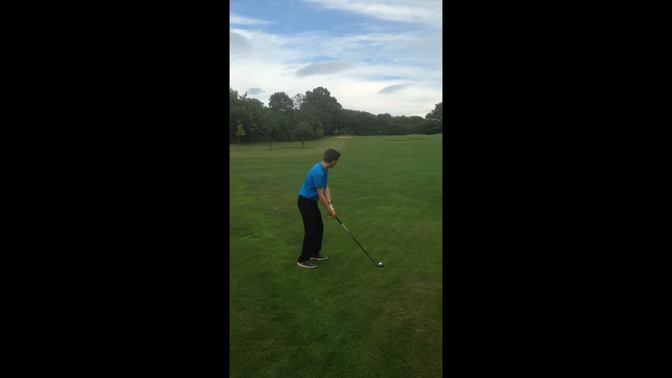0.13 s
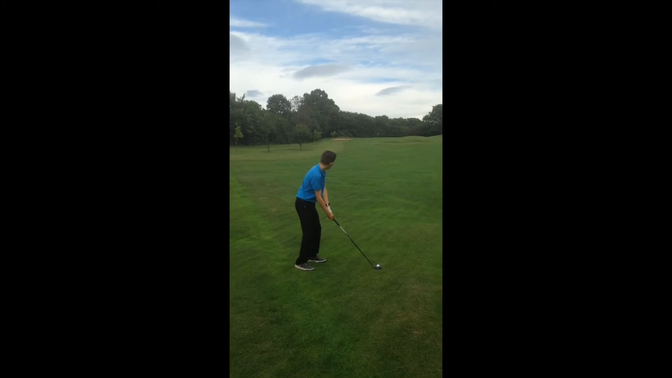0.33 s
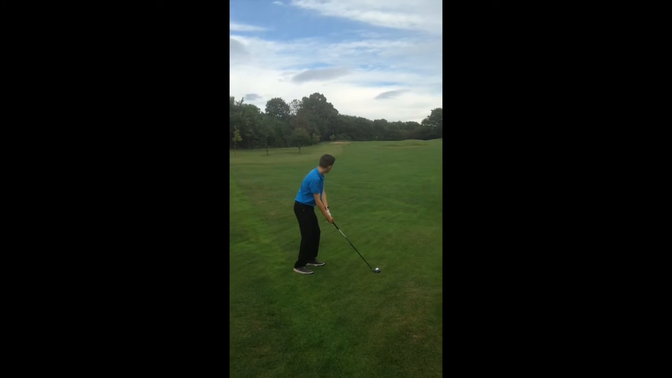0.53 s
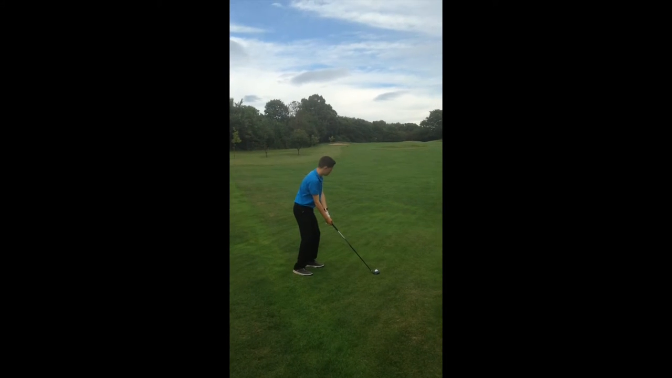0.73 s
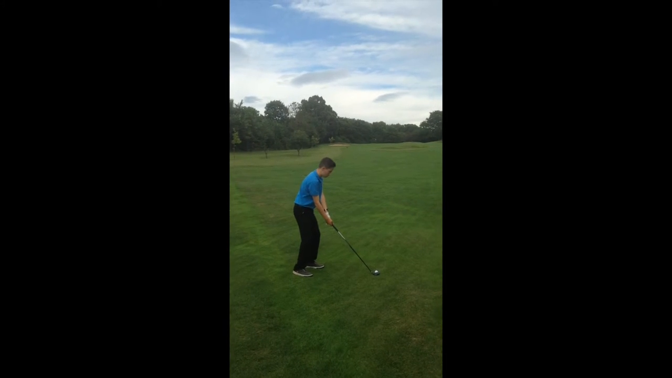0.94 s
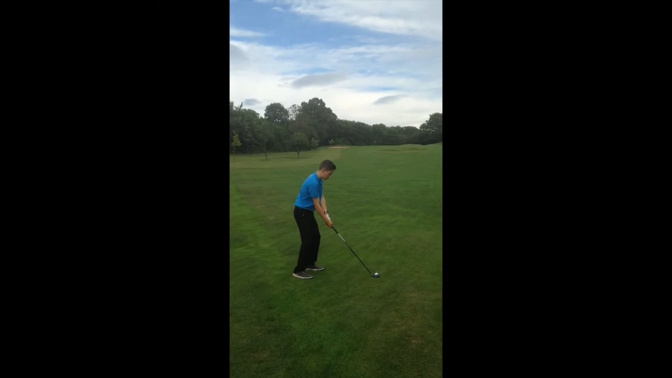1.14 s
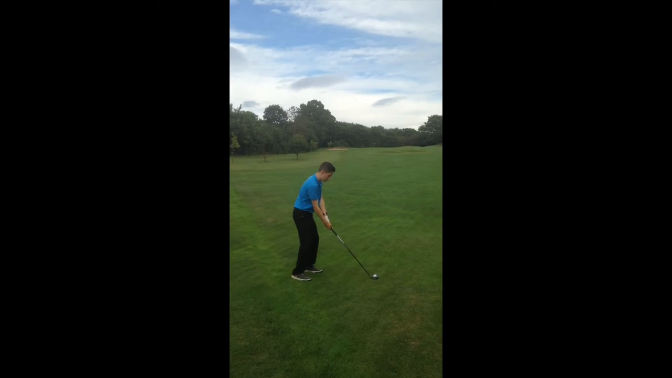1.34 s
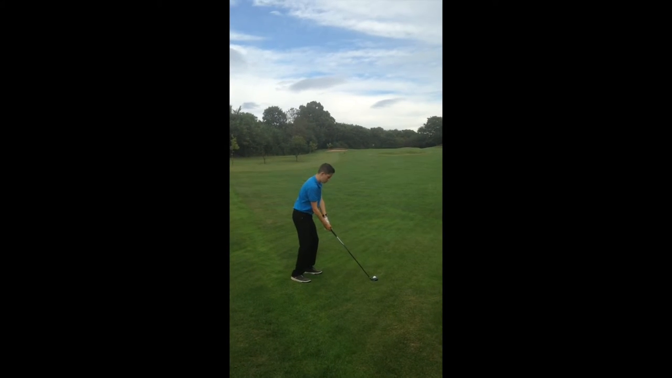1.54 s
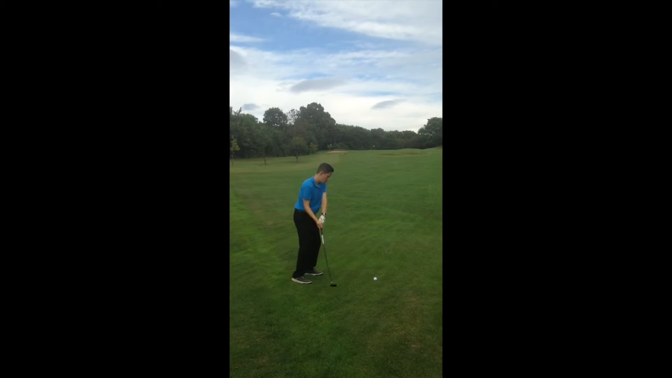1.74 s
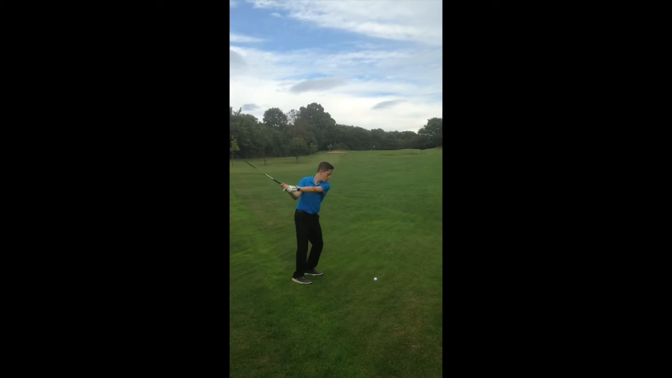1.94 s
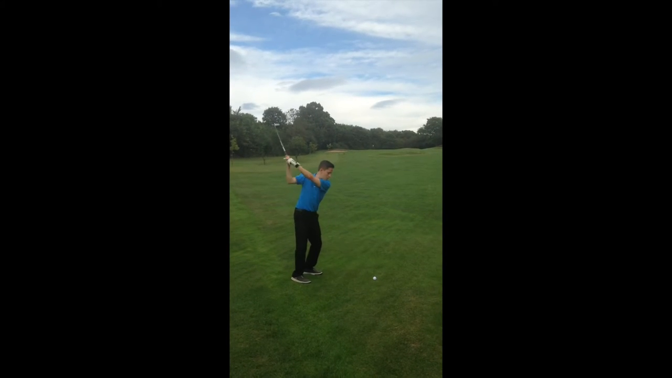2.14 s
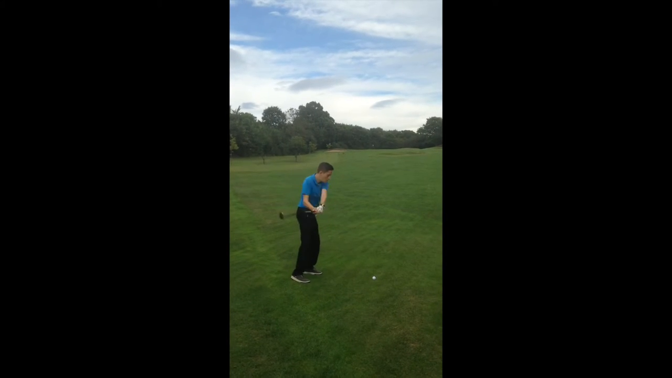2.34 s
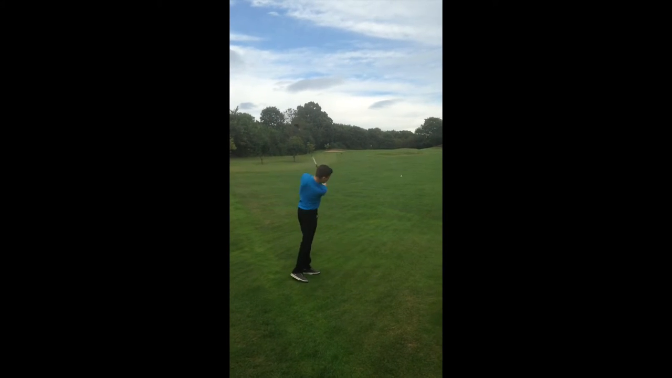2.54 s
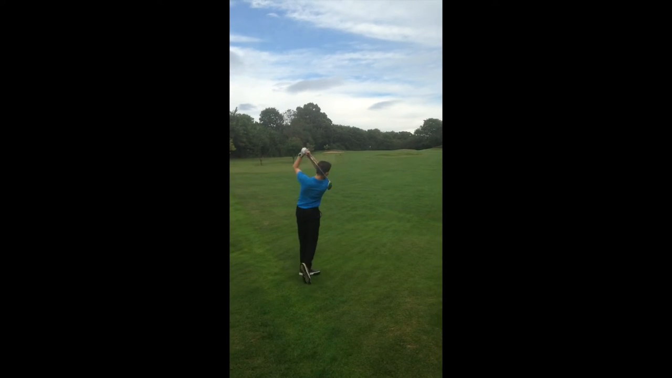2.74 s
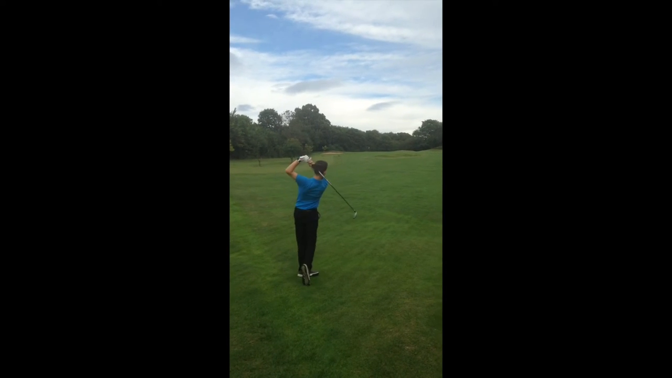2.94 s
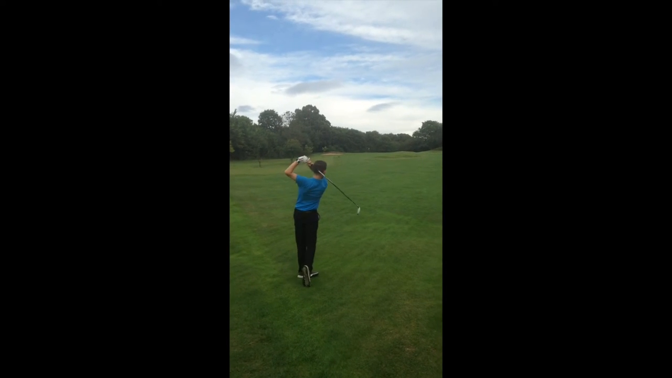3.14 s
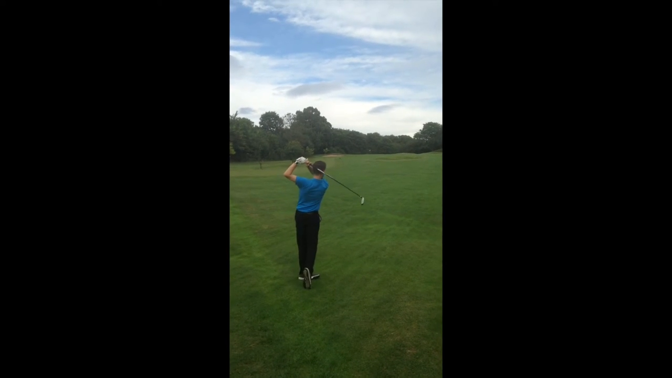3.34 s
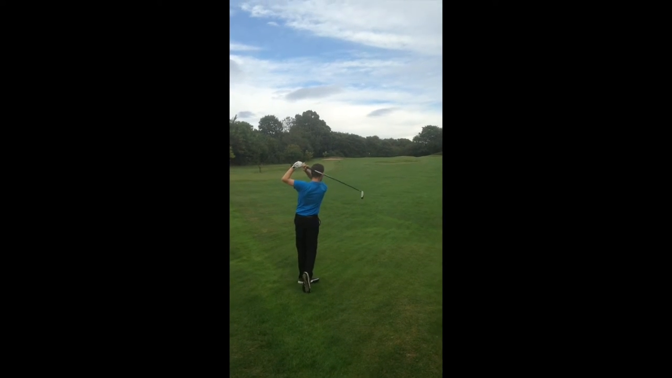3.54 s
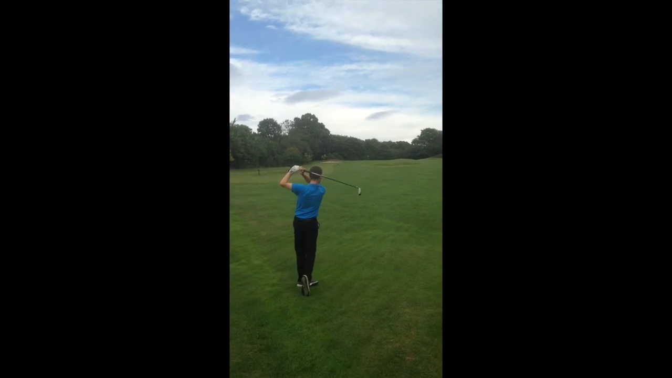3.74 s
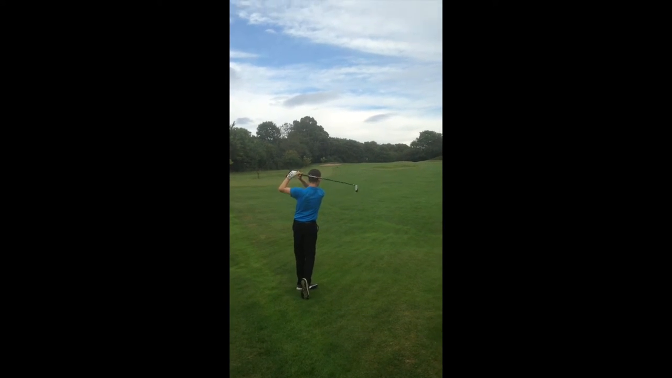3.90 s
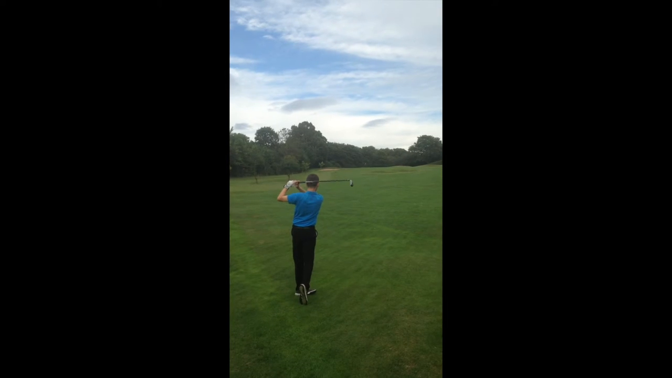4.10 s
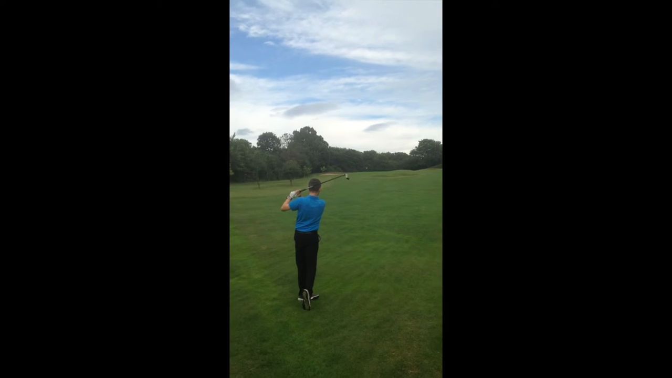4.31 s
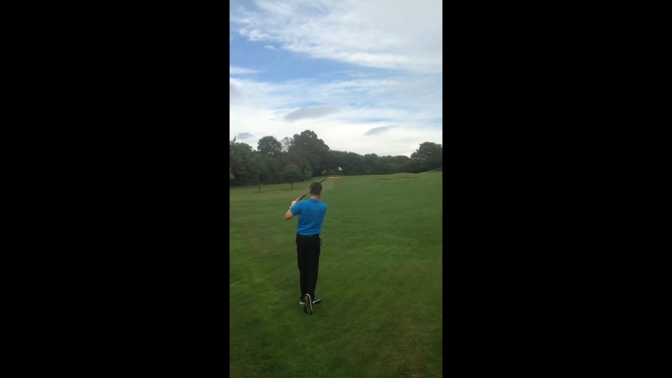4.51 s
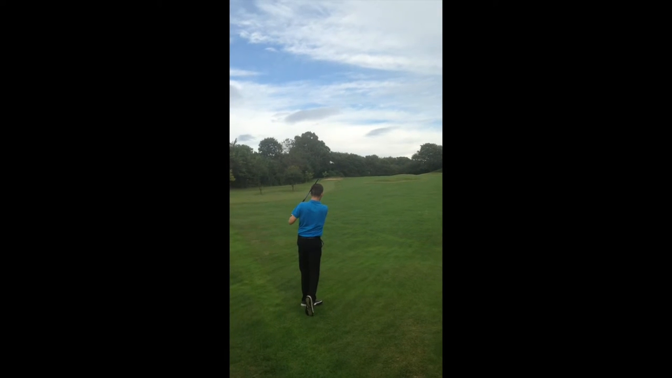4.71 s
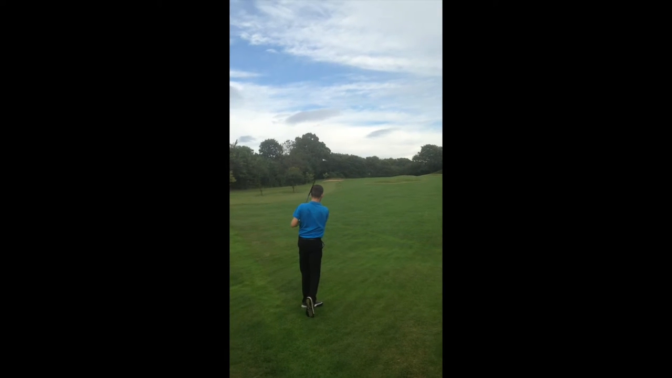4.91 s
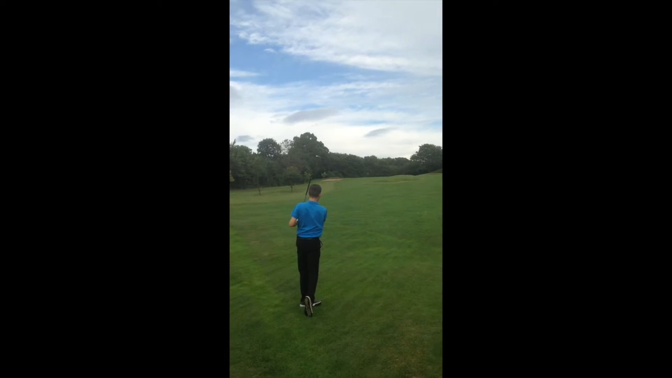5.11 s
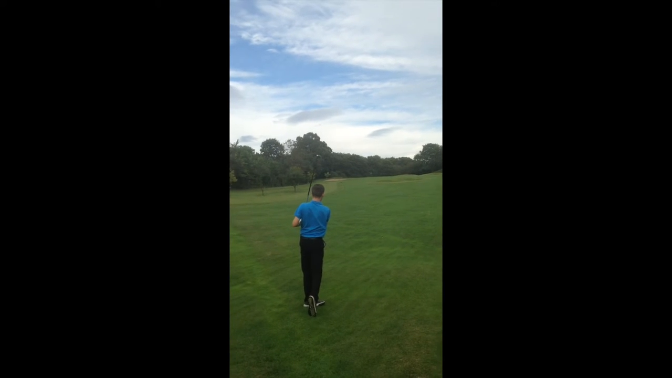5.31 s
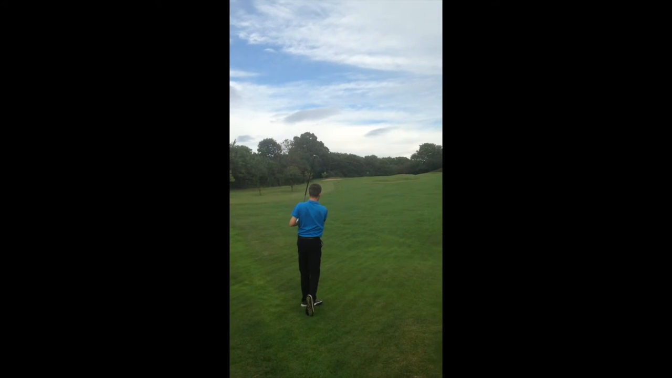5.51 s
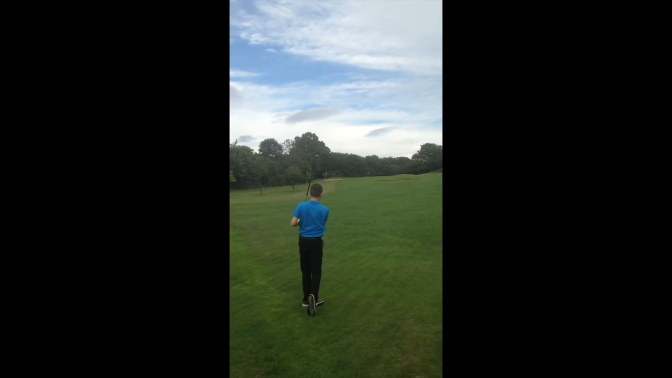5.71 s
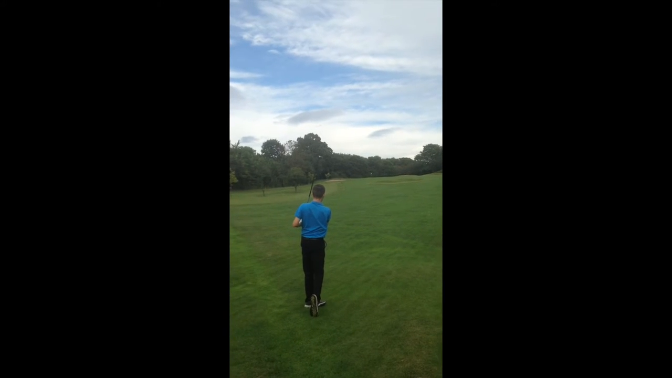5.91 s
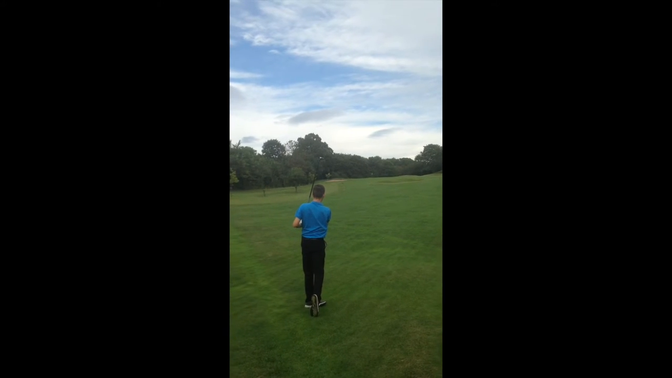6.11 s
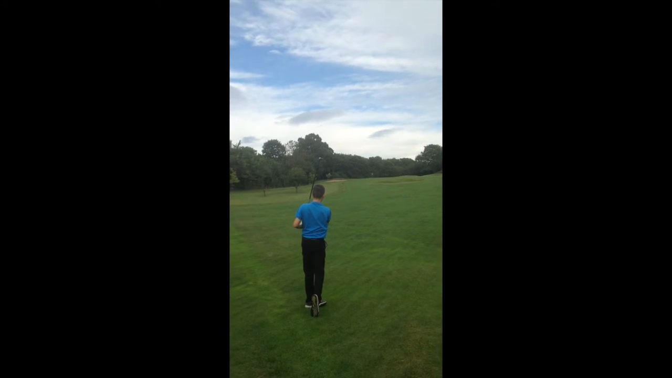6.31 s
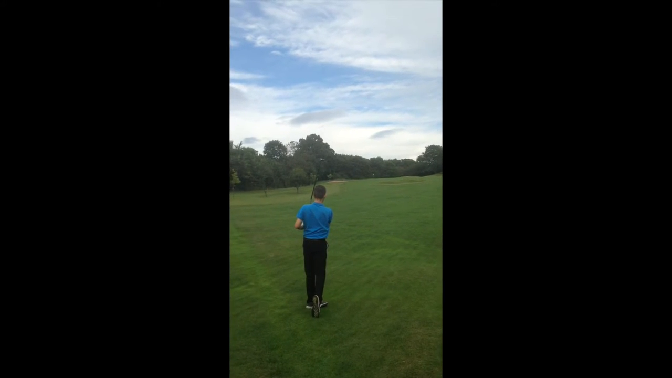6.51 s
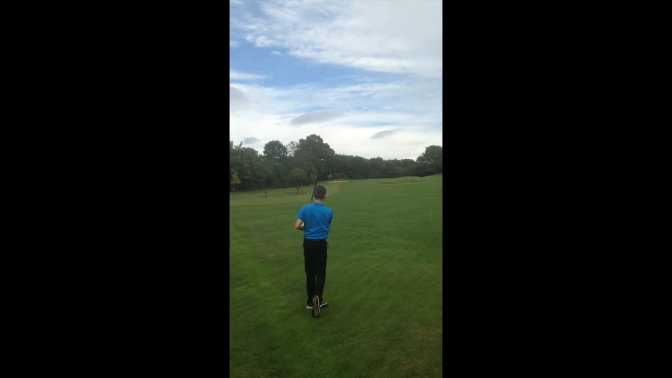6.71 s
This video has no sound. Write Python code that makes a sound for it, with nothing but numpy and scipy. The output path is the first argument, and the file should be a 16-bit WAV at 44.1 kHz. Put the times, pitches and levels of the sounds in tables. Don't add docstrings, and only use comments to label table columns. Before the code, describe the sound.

An open, breezy grass field heard through a hand-held phone a few metres from a golfer. From 0 s a quiet, low petrol engine drones far away, its buzzing notes and slight clatter wavering over soft rumble and smooth hiss. Small wind bumps touch the microphone near 0.1 s, and a dull little knock falls at 0.95 s. Just before 2.5 s a short airy swish rises quickly into one extremely sharp, loud club strike: a compact thud, bright steel click and brief tearing turf, over almost at once. A faint leafy echo returns within 0.2 s, with a soft follow-through whoosh near 2.7 s and tiny grit ticks near 2.77 s. The hum carries on, its bass thinning after 3.1 s. Light wind crackles and bumps gather around 4.05 s. The engine drifts farther off, its pitch sagging slightly, nearly gone by 6.7 s.

```python
import sys
import numpy as np
from scipy import signal
from scipy.fft import rfft, irfft
from scipy.io import wavfile
from scipy.ndimage import uniform_filter1d, map_coordinates

SR = 44100
rng = np.random.default_rng(int(sys.argv[2]) if len(sys.argv) > 2 else 0)


def generate_wav(signal):
    frames = np.transpose(np.atleast_2d(signal))
    scaled = np.clip(frames, -1, 1) * 32767
    pcm = np.round(scaled).astype(np.int16)
    wavfile.write(sys.argv[1], SR, pcm)


def to_linear_factor(level_db):
    exponent = np.asarray(level_db, float) / 20
    return 10 ** exponent


N = 297675
TIME = np.arange(N) / SR

# (time [s], cycle rate [Hz], level [dB])
ENGINE_DRIVE = [
    (0, 37.23, -53.5),
    (.9, 37.05, -53.5),
    (1.2, 36.69, -55),
    (2.0, 36.58, -53),
    (2.9, 36.49, -53.5),
    (3.6, 36.33, -59),
    (4.5, 36.18, -59),
    (5.0, 36.21, -59),
    (5.9, 35.94, -61),
    (6.75, 36.08, -63),
]
# (multiple of cycle rate, facing [dB], side-on [dB],
# half-turned [dB], three-quarters [dB], turned away [dB])
ENGINE_NOTES = [(2, 0, -4, -1, -7, -1.5), (3, -20, -24, -21, -17, -15), (4, 2.5, 1, 3.5, 5.5, 6),
                (6, 1.5, -3.5, -7, -6.5, -13), (8, -13.5, -8.5, -5.5, -9.5, -5),
                (9, -20, -33.5, -28, -27, -35), (10, -14.5, -12, -20.5, -27, -30),
                (11, -33, -20, -15, -13.5, -18), (12, -30, -40, -13, -7, -7),
                (13, -12, -16, -28.5, -24, -9), (14, -8, -6.5, -6, -8, -21),
                (15, -34, -17.5, -7, -5.5, -9.5), (16, -8, -31, -8, -5.5, -3.5),
                (17, -11.5, -16.5, -25.5, -32, -27), (18, -21.5, -13.5, -14.5, -20, -29.5),
                (19, -23, -16.5, -3.5, -5.5, -13.5), (20, -13.5, -17, -21.5, -8.5, -13),
                (21, -19, -14, -23, -33, -16), (22, -34, -25, -24, -24, -28),
                (23, -19, -33.5, -18, -18, -27), (24, -26, -25, -35, -25, -17.5),
                (25, -43, -25, -39, -39, -42), (26, -23, -39, -36, -34, -37)]
SIDE_TIMES = [0.698, 2.2, 3.55, 4.25, 5.1]
SHIMMER, SHIMMER_RISE = .07, 0.0099
WAVER, WAVER_RISE = .15, .0045

# (time [s], lift [dB], length [s], centre [octaves above 500 Hz])
BREATHS = [(.02, 4.5, 0.041, 1.3), (0.19, 11, 0.086, 1.5), (0.33, 9.5, .07, -5), (0.81, -2.5, 0.14, 0),
           (3.1, 6.5, 0.064, 6), (4.67, -5.5, 0.16, -4), (1.018, 5.5, 0.057, 0.9), (1.08, 5.5, 0.059, 3),
           (1.46, 3.5, 0.29, 1), (1.98, 7, 0.09, 3), (2.3, 2.5, 0.26, 1), (2.53, 9, 0.12, 1.83),
           (2.808, 6.5, 0.064, 0.4), (3.688, 8, 0.079, 2.5), (4.55, 1.5, 0.12, -2.5),
           (3.85, 3.5, 0.16, 0.7), (4.845, 4.5, 0.058, 1.5), (4.95, 4.5, 0.105, 0.7), (4.6, -3.5, 0.13, -4),
           (5.7, 2.5, 0.2, -3), (3.25, 3.5, 0.052, -3.5), (1.3, 2, .15, -1), (4.85, 3, .1, -4),
           (3.9, 5, 0.088, -4), (0.91, 0.5, 0.072, -1), (2.35, 2, .12, -6), (6.204, -3.5, .12, 0),
           (5.6, 4, 0.053, 3.5), (5.2, 4, 0.13, 1.3), (5.6, 0, 0.08, 6), (6.5, 5, 0.069, 1)]
BREATH_WIDTH_OCTAVES = 0.85
# (start [s], end [s], change [dB])
LULL_SPELLS = [
    (0.784, 0.947, 0.5),
    (3.099, 3.488, -5),
    (3.749, 4.281, -10.5),
    (4.313, 4.477, -5.5),
    (6.19, 6.9, -7.5),
]
LULL_NOTE_SHARES = {2: 0.34, 3: .9, 4: 1.16, 6: 0.48, 8: 0.44}
LULL_EDGE_S, LULL_RUMBLE_SHARE = 0.05, 0.25

# (frequency [Hz], level [dB per Hz])
FIELD_SPECTRUM = [(12, -51), (20, -30), (35, -14), (52, -2), (96, 0), (150, -1.5), (198, -7), (293, -6),
                  (347, -13.5), (430, -13), (574, -7.5), (642, -11.5), (718, -10), (1220, -20.5),
                  (2260, -25.5), (14700, -51), (16000, -42.5)]
FIELD_DB = -53.5
RUMBLE_FADE, ROAR_FADE, RASP_FADE, BRIGHT_FADE = 0.39, 0.36, 0.42, 0.76
CLATTER_SHARE, CLATTER_CHANGE_S, CLATTER_EVEN = .18, .07, .5
GROUND_LAG_S, GROUND_SHARE = .00786, 0.38

# (time [s], level [dB], length [s], polarity [+-])
PUFFS = [(.091, -35, .008, 1), (.1335, -35, .009, -1), (3.724, -30.5, .0036, -1), (3.727, -42, .003, 1),
         (4.105, -44, .005, -1), (4.169, -45, .005, 1), (4.0432, -36, .004, 1), (4.0452, -36, .014, -1),
         (4.0485, -36, .007, -1), (4.0508, -38, .004, 1), (4.0575, -39, .003, 1), (4.0803, -39, .006, -1),
         (4.0875, -42, .006, -1), (4.0905, -44, .008, 1), (4.0543, -37, .004, 1), (4.0667, -34, .003, -1),
         (4.0683, -38, .003, -1), (4.0772, -38, .006, 1), (4.0592, -31, .003, -1), (4.0526, -37, .003, -1),
         (4.0603, -32, .012, 1), (4.0633, -34, .003, 1), (4.0646, -25.5, .004, -1), (4.0711, -32, .004, -1),
         (4.0745, -33, .011, 1)]
# (time [s], level [dB], length [s])
BUFFETS = [
    (.1, -52.5, .06),
    (3.95, -60, .02),
    (4.06, -56, .018),
    (4.26, -68, .02),
    (6.17, -60, .04),
]
PUFF_RISE, PUFF_FALL = .11, .3

# (time [s], level [dB], length [s], centre [Hz])
PANEL_GLINTS = [(.18, -64, 0.045, 2300), (.4, -70, 0.056, 1900), (0.397, -75, .05, 2900),
                (.56, -74, 0.056, 2390), (1.4, -69, .08, 990), (1.95, -72, .06, 1000),
                (3.03, -71, 0.076, 1350), (4.12, -71, 0.054, 1500), (4.9, -77, .05, 2750),
                (5.09, -75, .05, 3100), (5.12, -76, .05, 2500), (0.884, -73, 0.042, 2500),
                (1.06, -73, .04, 2350), (1.5, -76, .06, 2580), (1.83, -70, 0.031, 2000),
                (1.964, -68, 0.069, 2230), (2.077, -71, .04, 2350), (2.31, -74, 0.043, 2000),
                (3.47, -75, 0.049, 2700), (3.65, -75, 0.032, 3050), (4.05, -72.5, .05, 2350),
                (5.04, -72, 0.03, 1650), (4.24, -77, 0.057, 2450), (4.65, -75, .1, 1350),
                (4.82, -75, .04, 2930), (4.954, -69, 0.061, 1490), (5.268, -70, 0.092, 1385),
                (5.579, -75, .05, 2500), (5.61, -81, .04, 2850), (6.47, -80.5, 0.045, 2800),
                (6.72, -76, .04, 1500)]
GLINT_WIDTH = 0.062

# (time [s], level [dB], centre [Hz], length [s])
GRIT_TICKS = [
    (.191, -67, 5900, .002),
    (.945, -52, 800, .003),
    (2.757, -72, 10500, .0008),
    (2.771, -69, 14000, .0008),
    (2.783, -73, 13000, .0008),
    (2.793, -75, 13500, .0008),
]

# (frequency [Hz], level [dB per Hz])
SWISH_SPECTRUM = [(1500, -20), (2500, 0), (5000, -4), (9000, -7), (13000, -10), (15500, -14)]
DOWNSWING_DB, DOWNSWING_RISE_DB_S, DOWNSWING_FALL_DB_S = -61, 151, 280
FOLLOW_S, FOLLOW_DB, FOLLOW_LENGTH_S = 2.67, -67.5, 0.12

STRIKE_S, STRIKE_DB, CONTACT_S = 2.490612, .4, .00003
# (frequency [Hz], level [dB], t60 [s], signed weight)
HEAD_MODES = [(696, -7.0, 0.0033, 1), (1330, 1.9, 0.0021, -1), (1993, -9.5, 0.0024, 1),
              (2413, -13.1, 0.003, 1), (4092, -24.1, 0.012, 1), (5017, -12.0, 0.003, 1),
              (5788, -29, 0.034, 1), (6770, -30, .012, -1), (7230, -14.9, 0.0046, -1),
              (9212, -33, 0.15, -1), (9286, -22, 0.4, -1), (9300, -21, .012, -1), (9341, -36, 0.2, -1),
              (9480, -37, 0.1, -1), (9570, -36, .05, 1), (11150, -24, 0.032, 1), (11723, -17.7, 0.0133, 1),
              (434, -23, 0.0065, 0.52), (2650, -34, 0.027, 0.89), (3220, -37.5, 0.031, 1),
               (3999.5, -28, 0.018, 0.93), (8020, -24.5, 0.022, 0.86), (10000, -34, .04, 1),
               (10400, -25, 0.012, 1), (10750, -27, .006, -1), (13200, -22, .01, 1),
               (12280, -14.5, 0.029, -1.5), (12950, -12.5, .011, 1), (13800, 3, .0025, 0.62),
               (14650, 1.5, 0.0044, -1)]
SWING_AWAY_S = .027
# (delay [s], level [dB], cut-off [Hz])
GRASS_BOUNCE = (.003, -24, 2600)
DIVOT_DB, DIVOT_T60_S = -35.5, 0.022
# (delay [s], spread [s], level [dB], centre [Hz])
TREE_ECHOES = [
    (.04, .01, -72, 6000),
    (.14, .018, -71, 6150),
    (.148, .02, -71, 4650),
    (.16, .025, -72, 3150),
    (.215, .015, -75, 4600),
    (.15, .03, -68, 2200),
]


def level(x, db):
    return x * to_linear_factor(db) / np.sqrt(np.mean(x ** 2))


def noise():
    return rng.standard_normal(N)


def curves(table):
    s, *columns = np.transpose(table)
    return [np.interp(TIME, s, c) for c in columns]


def bell(s, length, time=TIME):
    return np.exp(-.5 * ((time - s) / length) ** 2)


def band(x, lo_hz, hi_hz, order=2):
    sos = signal.butter(order, [lo_hz, min(hi_hz, 21000)], "band", fs=SR, output="sos")
    return signal.sosfilt(sos, x)


def walk(rate):
    held = np.repeat(rng.standard_normal(int(N / SR * rate) + 2), 8)
    slewed = uniform_filter1d(uniform_filter1d(held, size=8), size=8)
    return 1.3 * np.interp(TIME * rate * 8, np.arange(len(held)), slewed)


def coloured(spectrum, lo_hz=1, hi_hz=30000, source=None, order=8):
    source = noise() if source is None else source
    hz = np.arange(1, N // 2 + 2) * SR / N
    point_hz, point_db = np.transpose(spectrum)
    gain = to_linear_factor(np.interp(np.log(hz), np.log(point_hz), point_db))
    edges = 1 / np.sqrt((1 + (lo_hz / hz) ** order) * (1 + (hz / hi_hz) ** order))
    return irfft(rfft(source) * gain * edges, N)


def swells(centres_hz):
    s, db, length, octave = np.transpose(BREATHS)
    distance = np.log2(np.c_[centres_hz] / 500) - octave
    reach = db * np.exp(-.5 * (distance / BREATH_WIDTH_OCTAVES) ** 2)
    lift_db = reach @ bell(s[:, None], length[:, None], TIME[::16])
    return np.repeat(lift_db, 16, axis=1)[:, :N]


def lulls():
    def step(s):
        return .5 + .5 * np.tanh((TIME - s) / LULL_EDGE_S)
    return sum(db * (step(start) - step(end)) for start, end, db in LULL_SPELLS)


def engine():
    hz, engine_db = curves(ENGINE_DRIVE)
    phase = 2 * np.pi * np.cumsum(hz) / SR
    multiples = np.array([row[0] for row in ENGINE_NOTES])
    lifts_db, loss_db = swells(multiples * hz.mean()), lulls()
    out = 0
    for k, lift_db, (_, *side_db) in zip(multiples, lifts_db, ENGINE_NOTES):
        air_db = lift_db + LULL_NOTE_SHARES.get(k, 0) * loss_db
        db = engine_db + np.interp(TIME, SIDE_TIMES, side_db) + air_db
        flutter = 1 + (SHIMMER + SHIMMER_RISE * k) * walk(9)
        drift = (WAVER + WAVER_RISE * k ** 2) * walk(5 + .6 * k)
        lag = 0.27 * k + 0.0602 * k ** 2
        out = out + to_linear_factor(db) * flutter * np.sqrt(2) * np.cos(k * phase + drift - lag)
    return out


def clatter():
    turns = np.cumsum(curves(ENGINE_DRIVE)[0]) / SR
    pattern = rng.standard_normal((200, 1200))
    pattern = pattern + CLATTER_EVEN * np.roll(pattern, 600, axis=1)
    repeat = map_coordinates(pattern, [TIME / CLATTER_CHANGE_S, turns % 1 * 1199], order=1)
    return np.sqrt(CLATTER_SHARE) * level(repeat, 0) + np.sqrt(1 - CLATTER_SHARE) * noise()


def grounded(x):
    mirror = np.interp(TIME - GROUND_LAG_S, TIME, x)
    return (x + GROUND_SHARE * mirror) / np.hypot(1, GROUND_SHARE)


def field():
    def centred(db):
        return db - np.mean(db)
    away_db = curves(ENGINE_DRIVE)[1]
    roar_lift, rasp_lift, bright_lift, rumble_lift = swells([600, 1250, 2500, 80])
    rumble_db = centred(RUMBLE_FADE * away_db + LULL_RUMBLE_SHARE * lulls() + rumble_lift)
    roar_db = centred(ROAR_FADE * away_db + roar_lift)
    rasp_db = centred(RASP_FADE * away_db + rasp_lift)
    bright_db = centred(BRIGHT_FADE * away_db + bright_lift)
    machine = clatter()
    rumble = to_linear_factor(rumble_db + 1.3 * walk(11)) * coloured(FIELD_SPECTRUM, hi_hz=315)
    roar = to_linear_factor(roar_db + 0.57 * walk(18)) * coloured(FIELD_SPECTRUM, 330, 895)
    rasp = to_linear_factor(rasp_db + .5 * walk(10)) * coloured(FIELD_SPECTRUM, 950, 1620, machine)
    bright = coloured(FIELD_SPECTRUM, 2030, 2880, machine, order=12)
    bright = to_linear_factor(-1.5 + 1.07 * bright_db + 1.8 * walk(21)) * bright
    hiss = to_linear_factor(0.2 * bright_db + 0.65 * walk(5.93)) * coloured(FIELD_SPECTRUM, lo_hz=2800)
    return level(rumble + grounded(roar + rasp + bright) + hiss, FIELD_DB)


def wind():
    puffs = 0
    for s, db, length, sign in PUFFS:
        side = np.where(TIME < s, PUFF_RISE, PUFF_FALL)
        puffs = puffs + sign * to_linear_factor(db) * bell(s, length * side)
    buffeting = sum(to_linear_factor(db) * bell(s, length) for s, db, length in BUFFETS)
    flutter = buffeting * level(band(noise(), 90, 340, order=3), 0)
    return band(puffs, 12, 2500, order=1) + flutter


def glints():
    machine, wide = grounded(clatter()), 1 + GLINT_WIDTH
    out = 0
    for s, db, length, hz in PANEL_GLINTS:
        out = out + bell(s, length) * level(band(machine, hz / wide, hz * wide), db)
    return out


def ticks():
    out = 0
    for s, db, hz, length in GRIT_TICKS:
        out = out + bell(s, length) * level(band(noise(), hz / 1.9, hz * 1.05), db)
    return out


def swing():
    late = TIME - STRIKE_S
    slope_db = np.where(late < 0, DOWNSWING_RISE_DB_S * late, -DOWNSWING_FALL_DB_S * late)
    air = level(coloured(SWISH_SPECTRUM, lo_hz=2500), 0)
    down = to_linear_factor(DOWNSWING_DB + slope_db) * air
    follow = to_linear_factor(FOLLOW_DB) * bell(FOLLOW_S, FOLLOW_LENGTH_S) * band(air, 1494, 8020, order=1)
    return down + follow


def decay(t, t60):
    return np.exp(-np.log(1000) * t / t60)


def strike():
    t = np.arange(SR // 4) / SR
    ring = 0
    for hz, db, t60, sign in (*HEAD_MODES,):
        ring = ring + sign * to_linear_factor(db) * np.sin(2 * np.pi * hz * t) * decay(t, t60)
    ring = ring / (1 + (t / SWING_AWAY_S) ** 6)
    contact = bell(STRIKE_S, CONTACT_S)
    direct = to_linear_factor(STRIKE_DB) * signal.fftconvolve(contact / contact.sum(), ring)[:N]

    delay, bounce_db, bounce_hz = GRASS_BOUNCE
    bounce = to_linear_factor(bounce_db) * band(np.interp(TIME - delay, TIME, direct), 700, bounce_hz, order=1)

    after = np.clip(TIME - STRIKE_S - .001, 0, None)
    divot = (after > 0) * decay(after, DIVOT_T60_S) * level(band(noise(), 1200, 7000), DIVOT_DB)

    echoes = 0
    for lag, spread, db, hz in TREE_ECHOES:
        leaves = level(band(noise(), hz / 1.06, hz * 1.05), db)
        echoes = echoes + bell(STRIKE_S + lag, spread) * leaves
    return direct + bounce + divot + echoes


def scene():
    return (engine() + field() + wind() + glints() + ticks() + swing() + strike())[None, :]


def roll_off(x):
    return signal.sosfilt(signal.butter(12, 17000, fs=SR, output="sos"), x)


def record(dry):
    heard = signal.sosfilt(signal.butter(1, 30, "high", fs=SR, output="sos"), dry)
    heard = signal.sosfilt(signal.ellip(8, .2, 24, 15300, fs=SR, output="sos"), heard)
    return roll_off(heard)


dry = scene()
out = record(dry)
generate_wav(out)
```